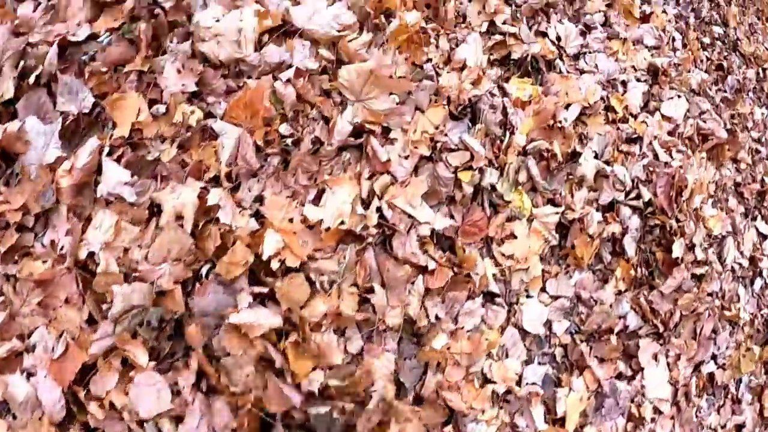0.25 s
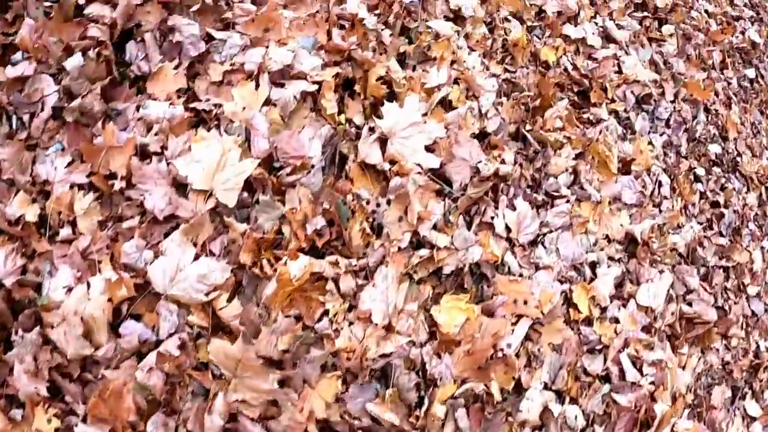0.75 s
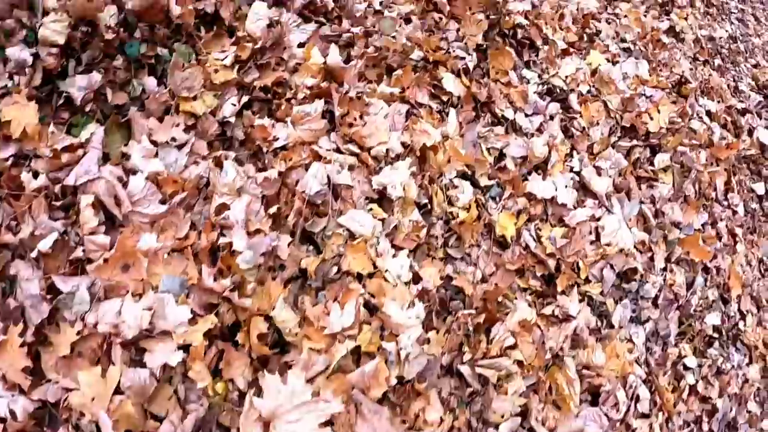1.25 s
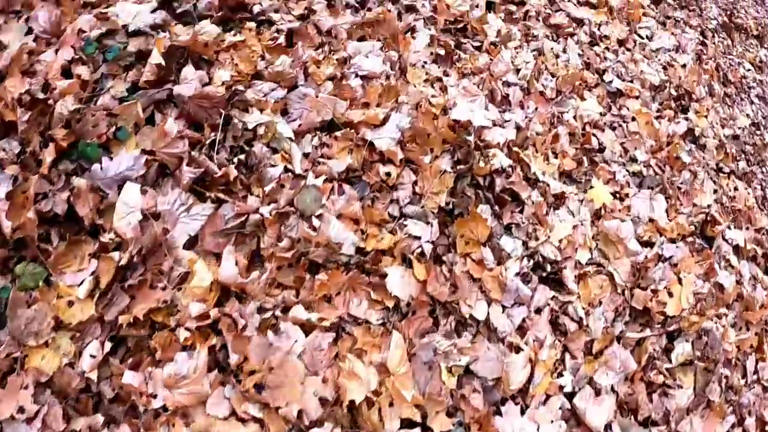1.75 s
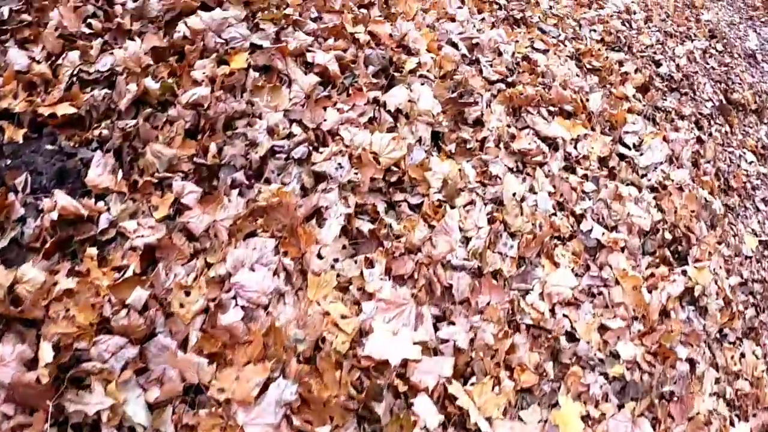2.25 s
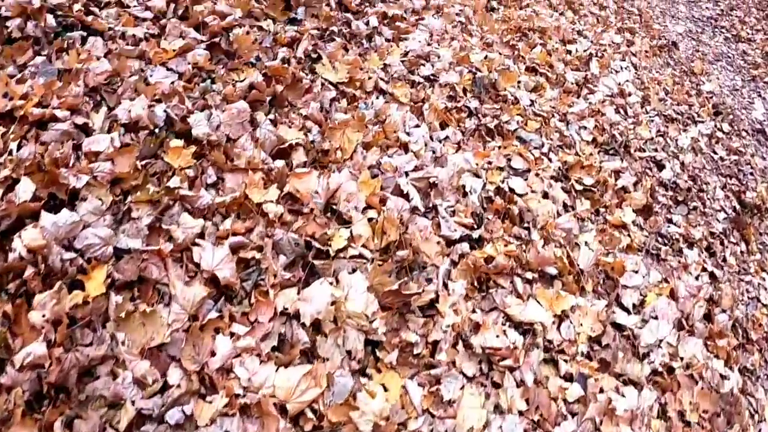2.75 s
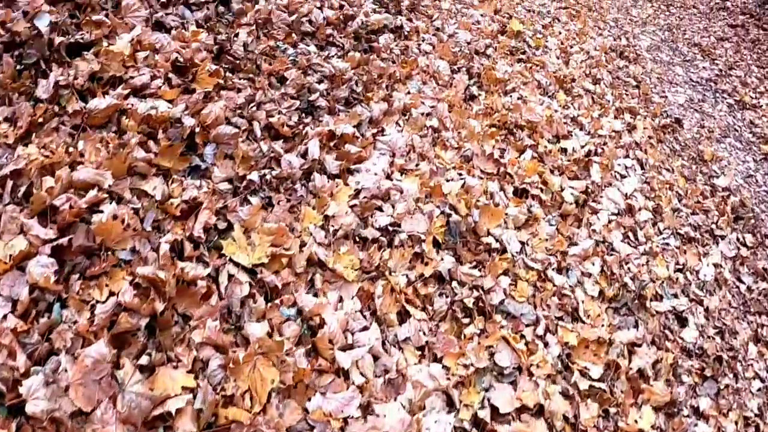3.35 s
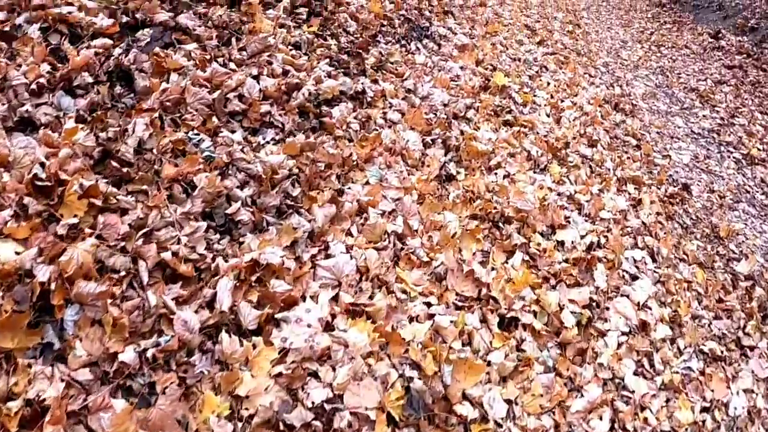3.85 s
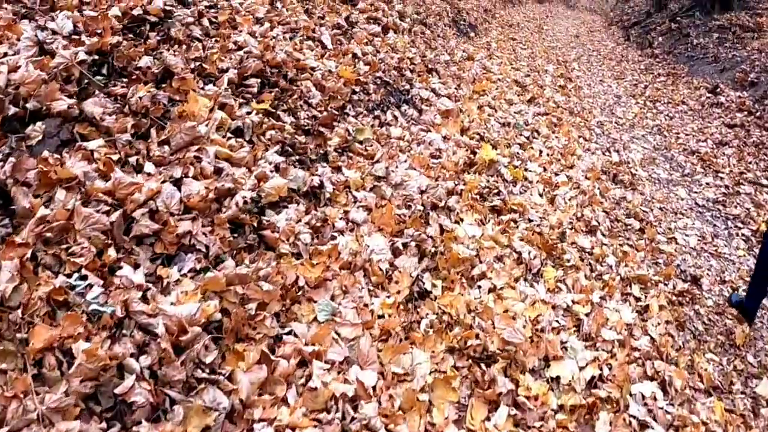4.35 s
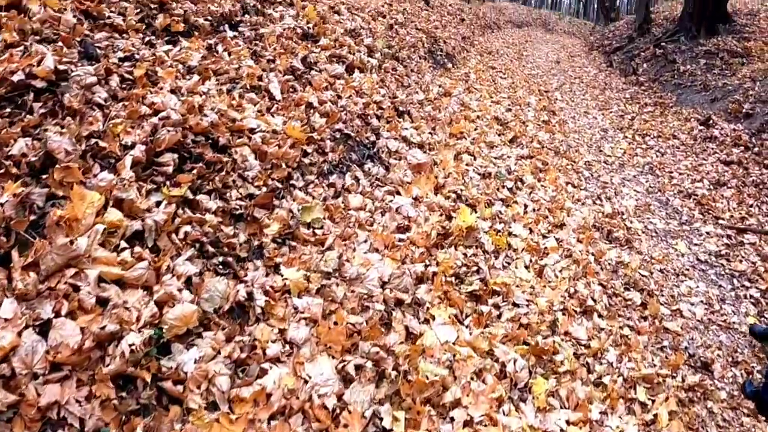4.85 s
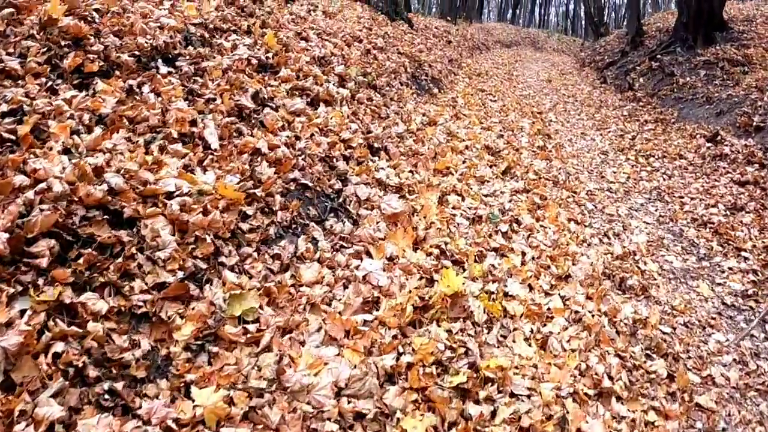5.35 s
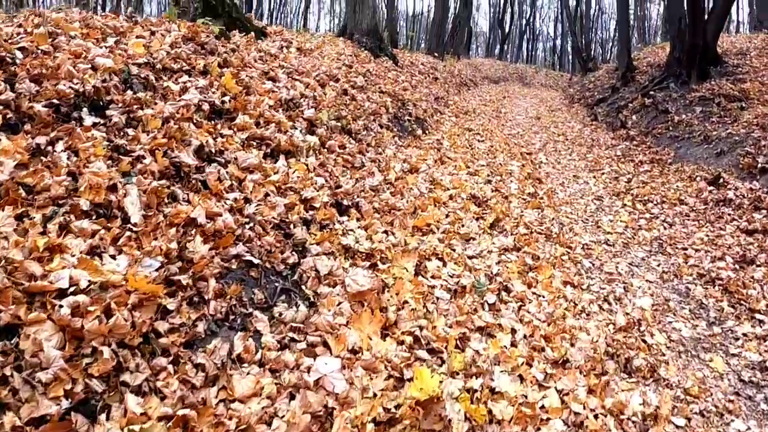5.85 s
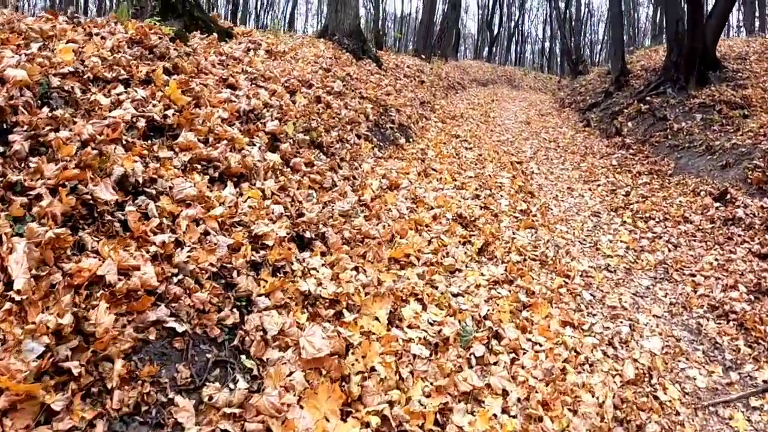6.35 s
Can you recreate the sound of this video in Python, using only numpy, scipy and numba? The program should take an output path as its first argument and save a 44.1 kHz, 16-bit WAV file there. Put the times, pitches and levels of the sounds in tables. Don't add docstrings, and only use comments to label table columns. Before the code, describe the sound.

Close, crackly footsteps swish and crunch through thick fallen leaves on a forest path, with brittle twigs snapping and quiet woods behind.

```python
import sys
import numpy as np
from scipy import signal
from scipy.fft import rfft, irfft
from scipy.io import wavfile
from scipy.ndimage import uniform_filter1d
from numba import njit

SR = 44100
rng = np.random.default_rng(int(sys.argv[2]) if len(sys.argv) > 2 else 0)


def to_wav(s):
    ch = np.atleast_2d(s).T
    pcm = np.round(np.clip(ch, -1, 1) * 32767)
    wavfile.write(sys.argv[1], SR, pcm.astype(np.int16))


def makeup_ratio(level_db):
    decades = np.asarray(level_db, float) / 20
    return 10 ** decades


N = 291501
TIME = np.arange(N) / SR
HZ = np.fft.rfftfreq(N, 1 / SR)

# f/Hz, level/dB
ROAD_SPECTRUM = [(12, -32), (20, 6), (48, 8), (102, -4), (500, -9), (650, -34), (1100, -120)]
# t/s, level/dB
DRONE_LEVEL = [(0.0, -49), (0.5, -55), (1.0, -63), (1.45, -79), (2.06, -65), (2.9, -55), (3.6, -53.5),
               (4.42, -51), (4.9, -55), (5.5, -53), (6.61, -58)]
# t/s, firing f/Hz, level/dB
ENGINE_RUN = [(3.3, 43, -87), (3.7, 48.8, -61), (4.1, 52.1, -49.5), (4.4, 55.8, -50), (4.7, 59.4, -59),
              (5.0, 62, -84)]
# f/Hz, level/dB
WOODS_SPECTRUM = [(180, -45), (300, -10), (2390, 5), (7600, -5.5), (8200, -12), (10200, -14), (12200, -28),
                  (14900, -55)]
# t/s, f/Hz, level/dB
BOOT_CREAK = [(5.89, 244.5, -68), (5.92, 237, -48), (5.945, 220, -42), (5.99, 201, -46), (6.02, 190, -62),
              (6.05, 188, -70)]
# t/s, peak level/dB, ring f/Hz, left minus right level/dB
TWIG_SNAPS = [(0.1284, -21.5, 3280, -0.5), (0.359, -15, 2270, 5), (0.5003, -25, 3030, 6),
              (0.9884, -36, 1390, -16), (1.1197, -19, 1500, -0.5), (1.334, -33, 1900, -8),
              (1.612, -7.5, 2620, 5), (1.834, -16, 2300, 3), (2.4526, -11.5, 1970, 3),
              (2.707, -16, 2800, 4), (2.7526, -20, 3080, 3.5), (3.306, -24, 2270, 2),
              (3.3134, -29, 2150, 7), (3.3864, -25, 2250, 2.5), (3.44, -26, 3850, 0),
              (3.888, -33, 3280, 1.5), (4.5634, -15, 2660, 4), (5.348, -21, 2480, 6),
              (5.426, -30, 3170, 3.5), (5.6431, -26, 2690, 4.5), (6.05, -35, 1610, -2)]
# t/s, peak level/dB, ring f/Hz, one third of the duration/cycles
ROOT_KNOCKS = [
    (0.74, -37, 120, 2),
    (3.79, -39, 110, 2),
    (4.2975, -24, 185, 2.2),
    (6.2712, -26, 1000, 1.7),
]
# t/s at full speed, length/s, level/dB, gathering/(dB/s), sag/dB
BOOT_SWINGS = [(-0.053, 0.297, -24.5, 60, 0.34), (0.732, 0.324, -25, 120, 4), (1.476, 0.28, -23.5, 58, 3),
               (2.127, 0.329, -26, 131, 2.5), (2.854, 0.287, -24.5, 52, 0.77),
               (3.554, 0.265, -25.5, 95, 2.5), (4.319, 0.24, -27.0, 55, 1.58),
               (4.942, 0.336, -31, 84, -0.63), (5.657, 0.334, -30.5, 193, -0.1),
               (6.382, 0.283, -34.0, 128, -9)]
# t/s, level/dB, half length/s
SOLE_SCUFFS = [(.07, -30, .05), (.303, -29.5, .078), (.406, -31.5, .05), (.58, -39, .102),
               (1.127, -32.5, .028), (1.19, -41, .03), (1.57, -31, .07), (1.823, -32.5, .054),
               (1.992, -36, .133), (2.523, -36, .052), (3.05, -31, .09), (3.19, -34, .083),
               (3.326, -40.5, .087), (3.87, -36.5, .07), (4.084, -38.5, .055), (4.645, -34, .07),
               (4.778, -43, .021), (5.2, -28.5, .08), (5.358, -37.5, .052), (5.527, -40.5, .08),
               (5.893, -33, .07), (6.019, -35, .042), (6.098, -34.5, .03), (6.278, -42, .042)]
# t/s, level/dB
LITTER_DRYNESS = [(0.0, 2.5), (0.45, -0.5), (0.75, 2), (1.2, -0.7), (2.7, -1), (3.3, 0), (4.1, -1),
                  (4.7, -2), (5.05, -0.1), (5.55, -0.6), (6.61, -0.6)]
# f/Hz, level/dB
LEAF_SPECTRUM = [(53, -43), (90, -15), (114, -14), (203, -10), (339, -11), (508, -7), (849, -7), (1120, -4),
                 (3630, -4), (4690, -5.5), (7040, -10.5), (8180, -18), (9910, -19), (12300, -26),
                 (14900, -39.5)]
REGION_HZ = (2800, 600, 10000, 170, 6000)
# rustle/(dB/dB), right push/dB, left push/dB, walked/(dB/s), dryness/(dB/dB)
WEIGHT_TILT = (.12, -1.1, -4, .12, -.25)
CRISP_TILT = (-.03, .1, -2, 0, 1.15)
SOIL_TILT = (-.3, 12, 15, .1, 0)
SHEEN_TILT = (-.05, 9, 7, .25, .5)
PAN_BALANCE = (-.05, 8, 18, .66, 0)
# f/Hz, left minus right level/dB
PORT_BALANCE = [(60, 0.0), (110, 0.0), (200, 0.5), (370, 0), (690, 1.5), (1260, 1), (2320, 5), (4270, 0.5),
                (7850, -2.5), (14400, 3.5)]
# f/Hz, left lead/rad
PORT_PHASE = [(0, 0.44), (3190, -0.26), (6030, -0.19), (7320, -0.56), (7750, 0.45), (8530, 1.0),
              (8870, 1.0), (12300, 0.1), (14600, 0.0)]
# f/Hz, likeness (0 to 1)
PORT_COHERENCE = [(60, 0.7), (130, 0.92), (290, 0.98), (630, 0.98), (1380, 0.94), (3010, 0.89),
                  (6590, 0.71), (14400, 0.34)]
OPPOSITE = np.array([[1], [-1]])


def level(x, db):
    return x * makeup_ratio(db) / np.sqrt(np.mean(x ** 2))


def along(table, at):
    s, *columns = np.transpose(table)
    return [np.interp(at, s, column) for column in columns]


def across(table):
    hz, value = np.transpose(table)
    return np.interp(np.log(HZ + 1), np.log(hz + 1), value)


def walk(rate):
    hold = int(SR / rate)
    steps = np.repeat(rng.standard_normal(N // hold + 1), hold)
    return 1.277 * uniform_filter1d(uniform_filter1d(steps, hold), hold)[:N]


def shaped_noise(spectrum):
    return irfft(rfft(rng.standard_normal((2, N))) * makeup_ratio(across(spectrum)), N)


def tone(table, wobble):
    hz, db = along(table, TIME)
    inside = (TIME > table[0][0]) & (TIME < table[-1][0])
    phase = 2 * np.pi * np.cumsum(hz * (1 + wobble * walk(20))) / SR
    return np.sqrt(2) * inside * makeup_ratio(db) * np.sin(phase)


@njit
def grains(start, hz, cycles, left, right, size):
    out = np.zeros((2, size))
    for g in range(len(start)):
        turn = 2 * np.pi * hz[g] / SR
        pole = np.exp(1j * turn - np.log(100.) * hz[g] / (cycles[g] * SR))
        z = 1. + 0j
        stop = min(size, start[g] + int(cycles[g] * SR / hz[g]) + 1)
        for i in range(start[g], stop):
            out[0, i] += left[g] * z.imag
            out[1, i] += right[g] * z.imag
            z *= pole
    return out


def road():
    mid, side = shaped_noise(ROAD_SPECTRUM)
    rumble = level(mid + .25 * side * OPPOSITE, -55) * makeup_ratio(1.6 * walk(3))
    drone_hz = 39.1
    phase = 2 * np.pi * np.cumsum(drone_hz * (1 + .025 * walk(8))) / SR
    drone_gain = makeup_ratio(along(DRONE_LEVEL, TIME)[0] + 2.6 * walk(9))
    drone = drone_gain * (np.sin(phase) + .35 * np.sin(2 * phase))
    lean = makeup_ratio(1.9 * walk(4.96) * OPPOSITE)
    return rumble + 1.38 * drone * lean + tone(ENGINE_RUN, wobble=0.017)


def woods():
    return level(shaped_noise(WOODS_SPECTRUM), -47.5) * makeup_ratio(0.5 * walk(6.2))


def creak():
    return tone(BOOT_CREAK, wobble=.03)


def snaps():
    s, db, hz, pan_db = np.transpose(TWIG_SNAPS)
    cycles = np.full(len(hz), 10.0)
    twigs = grains((s * SR).astype(np.int64), hz, cycles, makeup_ratio(db + pan_db / 2), makeup_ratio(db - pan_db / 2), N)
    s, db, hz, cycles = np.transpose(ROOT_KNOCKS)
    knocks = grains((s * SR).astype(np.int64), hz, 3.0 * cycles, -makeup_ratio(db), -makeup_ratio(db), N)
    return makeup_ratio(-2.5) * twigs + knocks


def strides():
    start, length, db, gather, sag = np.transpose(BOOT_SWINGS)[:, :, None]
    since = TIME - start
    gathering_db = gather * np.minimum(since, 0)
    sag_db = sag * np.clip(since / length, 0, 1)
    stop_db = 300 * np.maximum(since - length, 0)
    swing_db = db + gathering_db - sag_db - stop_db
    s, peak_db, half = np.transpose(SOLE_SCUFFS)[:, :, None]
    scuff_db = peak_db - 10 * ((TIME - s) / half) ** 2
    settling_db = -50
    power = np.sum(makeup_ratio(2 * swing_db), axis=0) + np.sum(makeup_ratio(2 * scuff_db), axis=0) + makeup_ratio(2 * settling_db)
    slew_s = .025
    rustle_db = uniform_filter1d(10 * np.log10(power), size=int(slew_s * SR))

    lag_s, rise_s, fade_s, before_s = 0.05, 0.3, .22, -0.36
    landings = np.vstack([(start + length)[:-1], [before_s]])
    after = np.maximum(TIME - landings - lag_s, 0)
    push = (1 - np.exp(-(after / rise_s) ** 2)) * np.exp(-after / fade_s)
    right_push, left_push = push[::2].sum(axis=0), push[1::2].sum(axis=0)
    controls = np.array([rustle_db, right_push, left_push, TIME, along(LITTER_DRYNESS, TIME)[0]])
    laws = (WEIGHT_TILT, CRISP_TILT, SOIL_TILT, SHEEN_TILT, PAN_BALANCE)
    return [rustle_db] + [np.dot(law, controls) for law in laws]


def crackle(busy, count, size, crumple_s, cycles, leaf_db, crack_db):
    leaf_time, leaf_pitch, leaf_force, leaf_place = np.repeat(rng.random((count, 4)), size, axis=0).T
    delay, detune, force, sign, damping = rng.random((count * size, 5)).T
    begin = np.interp(leaf_time, np.cumsum(busy) / np.sum(busy), np.arange(N))
    start = ((begin + delay * crumple_s * SR) % N).astype(np.int64)
    hz = 120 * (13000 / 120) ** leaf_pitch ** 0.4208
    hz = np.minimum(hz * 2.6 ** (detune - .5), .4 * SR)
    db = -leaf_db * np.log(1 - .998 * leaf_force) - crack_db * np.log(1 - .998 * force)
    gain = makeup_ratio(db) * np.sign(sign - .5) / np.sqrt(busy[start])
    ring = cycles * np.sqrt(hz / 2500) * (0.41 + 2 * damping ** 2)
    place = (2 * leaf_place - 1) * np.sqrt(3)
    return grains(start, hz, ring, gain, gain * place, N)


def hear_at_ports(flat):
    alike = np.clip(across(PORT_COHERENCE), 0, 1)
    lean = makeup_ratio(across(PORT_BALANCE) / 2) * np.exp(.5j * across(PORT_PHASE))
    mid = np.sqrt(1 + alike) * flat[0]
    side = 0.8 * np.sqrt(1 - alike) * flat[1]
    ports = np.array([(mid + side) * lean, (mid - side) / lean]) * makeup_ratio(across(LEAF_SPECTRUM))
    off_hz = HZ - 7920
    edge_db = -1.5 / 2 * np.tanh(off_hz / 150) * np.exp(-np.abs(off_hz) / 900)
    return ports * makeup_ratio(edge_db)


def leaves():
    rustle_db, *tilts_db, pan_db = strides()
    busy = makeup_ratio(.35 * (rustle_db - rustle_db.max()))
    bed = rfft(crackle(busy, count=45000, size=6, crumple_s=.014, cycles=8, leaf_db=.8, crack_db=2.0))
    flat = bed / np.sqrt(uniform_filter1d(np.abs(bed) ** 2, size=1500, axis=1))
    ports = hear_at_ports(flat)
    out, order = 0, np.argsort(REGION_HZ)
    swell = 0.4 * walk(25)
    for k, tilt_db in enumerate([0 * TIME] + tilts_db):
        region = np.interp(np.log(HZ + 1), np.log(np.sort(REGION_HZ)), order == k)
        patchy_db = tilt_db - np.mean(tilt_db) + swell + 0.35 * walk(12)
        out = out + makeup_ratio(patchy_db) * irfft(ports * region, N)
    pan_db = pan_db - np.mean(pan_db)
    return level(out, 1.54) * makeup_ratio(rustle_db + pan_db * OPPOSITE / 2)


def scene():
    return road() + woods() + creak() + snaps() + leaves()


def roll_off(x):
    return signal.sosfilt(signal.butter(12, 15150, fs=SR, output="sos"), x)


def record(dry):
    return roll_off(dry)


dry = scene()
out = record(dry)
to_wav(out)
```